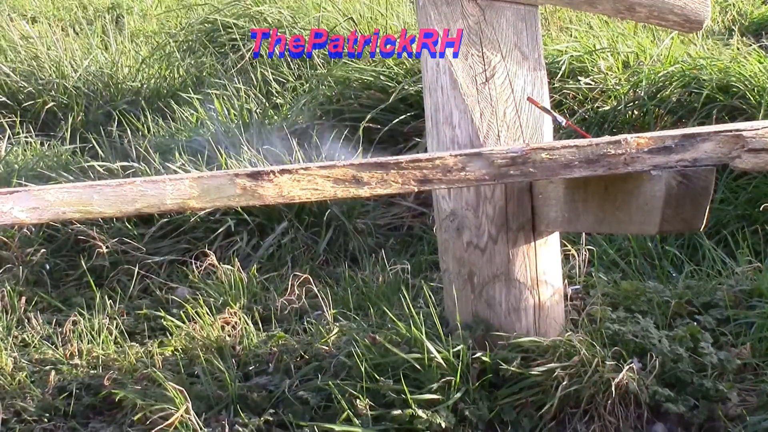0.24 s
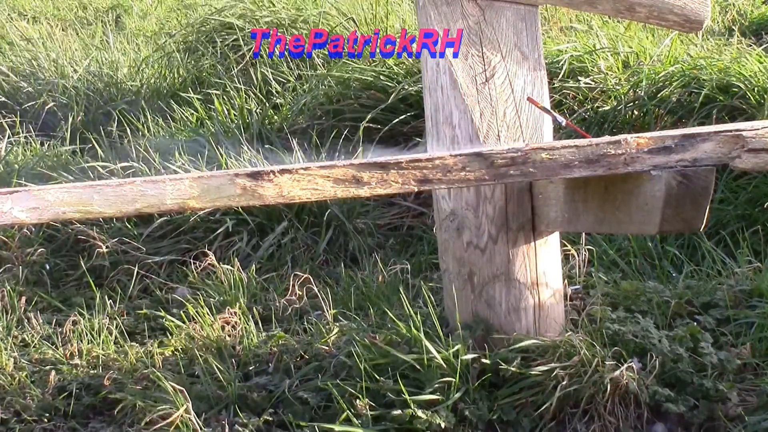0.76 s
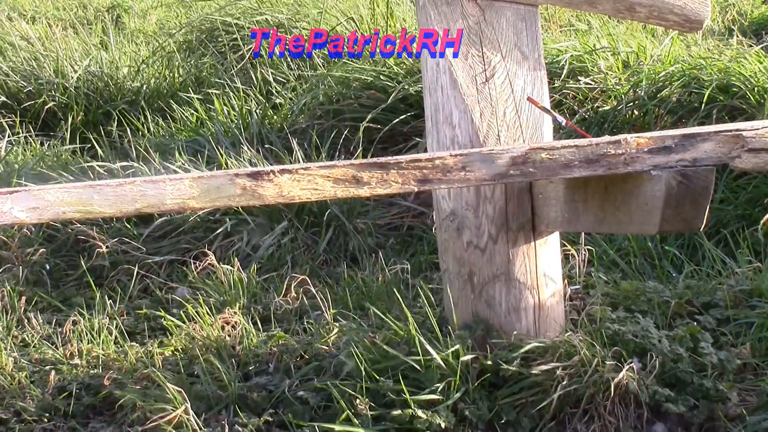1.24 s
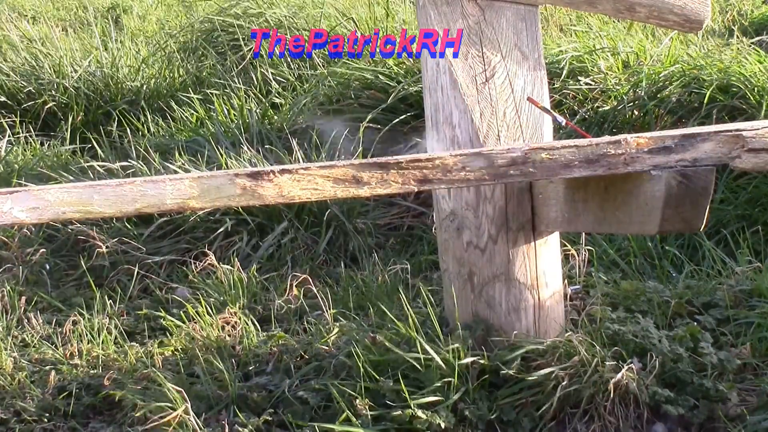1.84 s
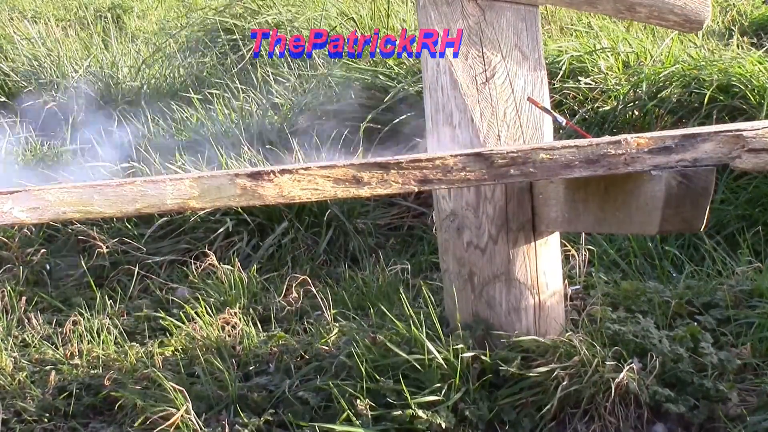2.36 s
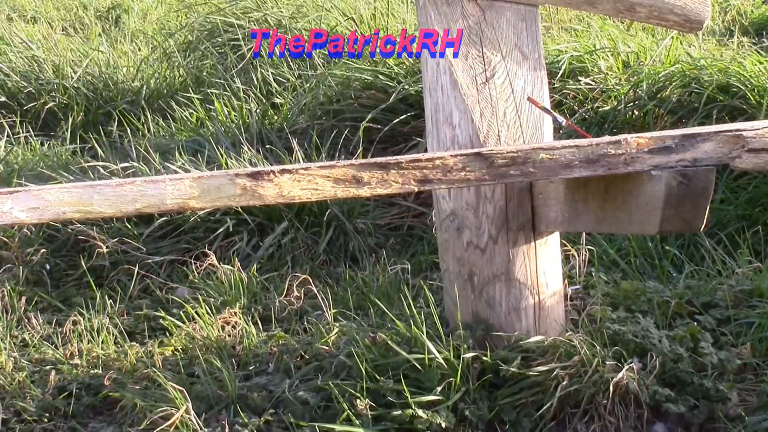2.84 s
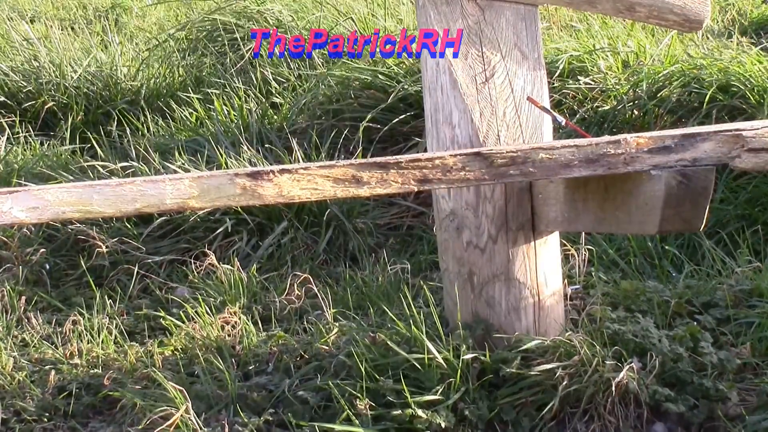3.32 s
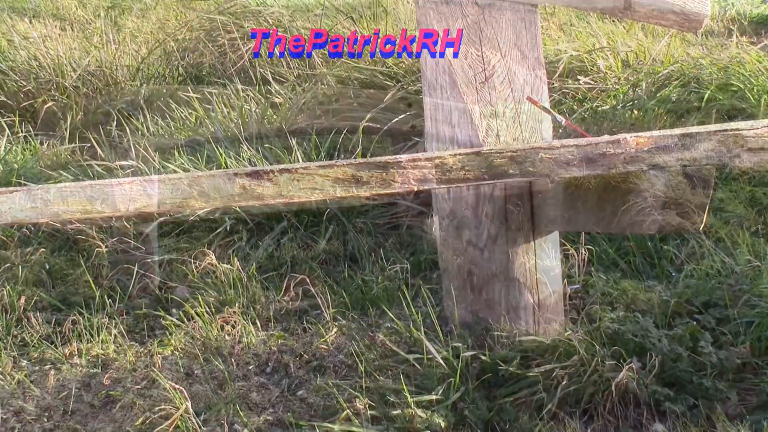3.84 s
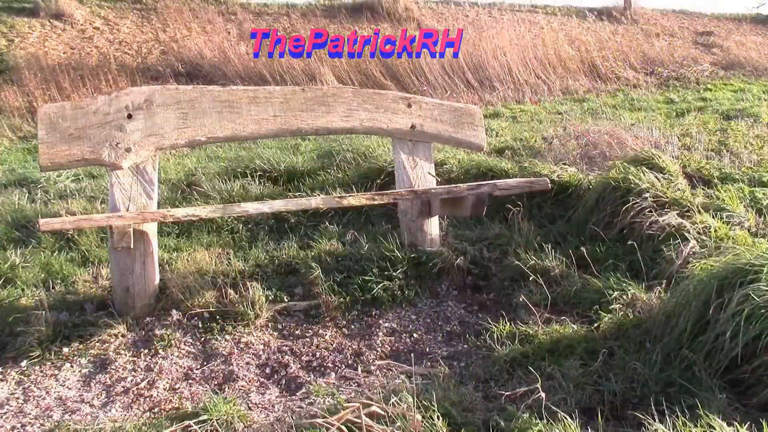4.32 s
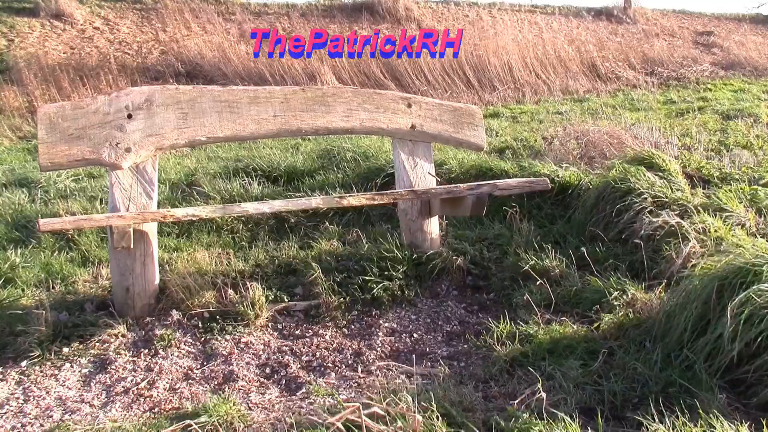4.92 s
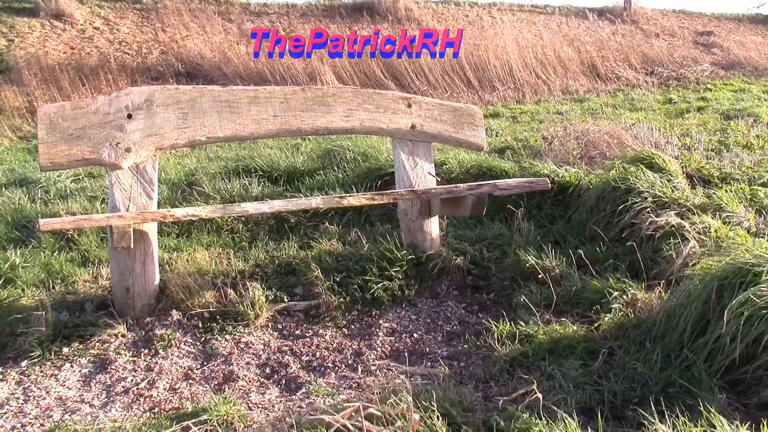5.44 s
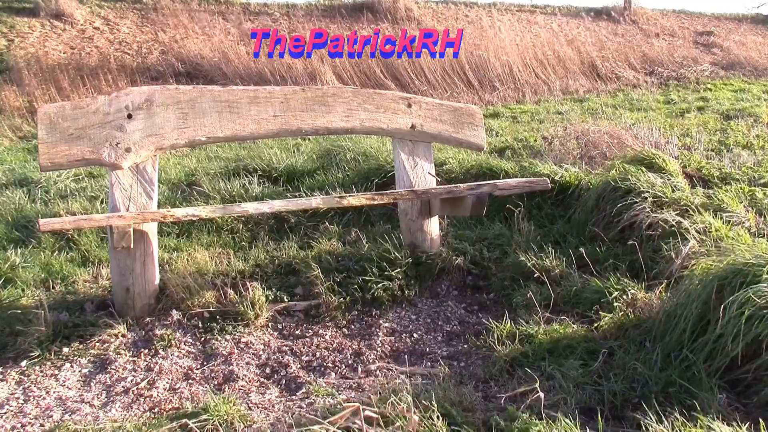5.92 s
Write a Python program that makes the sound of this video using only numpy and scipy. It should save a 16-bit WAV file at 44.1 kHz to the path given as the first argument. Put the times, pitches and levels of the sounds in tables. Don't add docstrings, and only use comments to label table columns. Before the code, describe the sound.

A burning fuse fizzes in uneven jets by a wooden bench while strong wind rumbles directly on the stereo microphone. Fine ticks and a louder crack precede a single dry, distorted firecracker bang. Faint echoes return from distant banks; everything else is briefly quieter, then buffeting gusts recover, with thin grass rustle and no further explosions.

```python
import sys
import numpy as np
from scipy import signal
from scipy.fft import rfft, irfft
from scipy.io import wavfile
from scipy.ndimage import uniform_filter1d, minimum_filter1d

SR = 44100
rng = np.random.default_rng(int(sys.argv[2]) if len(sys.argv) > 2 else 0)


def linear_from_db(decibels):
    return 10 ** (np.asarray(decibels, float) / 20)


def to_wav(s):
    ch = np.atleast_2d(s).T
    pcm = np.round(np.clip(ch, -1, 1) * 32767)
    wavfile.write(sys.argv[1], SR, pcm.astype(np.int16))


N = 272538
BANG_S = 2.4138

# start in seconds, peak in dB, flash of brightness in dB.
SLAPS = [(0.023, -13.5, 13), (0.042, 3.5, 1), (0.082, -4, 9.5), (0.198, -5, 4.5), (0.429, -5, 0.5),
         (0.614, -2, 3), (0.997, -6.5, 5), (1.024, 0, 1.5), (1.393, -3.5, 4), (1.434, 3, -0.5),
         (1.454, -4.5, 6.5), (1.542, -3.5, -0.5), (1.813, -19, 2), (2.109, -1.5, 5), (2.257, -8.5, 11.5),
         (2.369, -10.5, 5.5), (2.781, -20, 13), (2.876, -19.5, 8.5), (3.012, -23, 17.5), (3.33, -21.5, 8),
         (3.656, -19, 8), (4.678, -5, 6.5), (4.797, -6, 3), (4.866, -7, 7.5), (4.884, -5.5, 3),
         (5.376, -4, 2.5), (5.556, -8, 13.5), (5.601, -12, 1), (5.753, -8.5, 0), (5.991, -10.5, 3.5)]
# start in seconds, length in seconds, speed gain in dB.
PUFFS = [(0.081, 0.068, 9.5), (0.174, 0.017, 4.5), (0.321, 0.02, 6), (0.645, 0.15, 1.5),
         (1.101, 0.061, 4.5), (1.256, 0.028, 3.5), (1.364, 0.12, 2.5), (1.478, 0.016, 3),
         (1.801, 0.013, 12), (2.111, 0.01, 7.3), (2.161, 0.062, 6), (2.858, 0.0086, 5),
         (2.871, 0.089, 11.5), (3.221, 0.023, 6), (3.316, 0.012, 1.5), (3.378, 0.011, 3.5),
         (3.487, 0.025, 3), (3.574, 0.042, 5), (3.801, 0.014, 6), (3.87, 0.017, 9.5), (3.923, 0.049, 6.5),
         (4.005, 0.04, 2.5), (4.51, 0.015, 3), (4.666, 0.018, 0), (4.831, 0.045, 2.5), (5.252, 0.043, 1),
         (5.552, 0.013, 6.5), (5.63, 0.039, 3.0), (5.988, 0.0079, 8.5)]
PUFF_ATTACK_S, PUFF_RELEASE_S = 0.0027, 0.0099
# lower edge in Hz, upper edge in Hz.
GUST_HZ = [(40, 130), (150, 600), (800, 1600), (2000, 3500)]


def curve(rows):
    s, *columns = np.transpose(rows)
    return [np.interp(np.arange(N) / SR, s, c) for c in columns]


def unit(x):
    return x / np.sqrt(np.mean(x ** 2))


def colour(x, shape):
    hz, db = np.transpose(shape)
    grid = np.maximum(np.arange(2049) * SR / 4096, 1)
    ceps = irfft(np.log(linear_from_db(np.interp(np.log(grid), np.log(hz), db))))
    ceps[1:2048] *= 2
    ceps[2049:] = 0
    kernel = irfft(np.exp(rfft(ceps)))
    if x.ndim == 2:
        kernel = kernel[None]
    return signal.fftconvolve(x, kernel)[..., :x.shape[-1]]


def band(x, lo_hz, hi_hz, order=2):
    edges = [lo_hz, min(hi_hz, .45 * SR)]
    return signal.sosfilt(signal.butter(order, edges, "band", fs=SR, output="sos"), x)


def walk(rate):
    k = int(SR / rate)
    held = np.repeat(rng.standard_normal(N // k + 1), k)
    return unit(uniform_filter1d(held, k)[:N])


def clicks(rate, scatter_db):
    hit = rng.random(N) < rate / SR
    sign = np.sign(rng.standard_normal(N))
    return unit(hit * sign * linear_from_db(scatter_db * np.minimum(rng.exponential(size=N), 4)))


def burst(s, t60, length=.4):
    t = np.arange(N) / SR - s
    return (t >= 0) * (t < length) * linear_from_db(-60 * np.clip(t, 0, length) / t60)


def swell(s, length, attack, release):
    t = np.arange(N) / SR - s
    return np.clip(t / attack, 0, 1) * np.clip((length + release - t) / release, 0, 1)


def gain_db():
    duck_db, recover_db_per_s = 18, 4.5
    ahead_s, ramp_s = .036, .022
    since = np.arange(N) / SR - BANG_S
    drop = np.clip((since + ahead_s) / ramp_s, 0, 1)
    return drop * np.minimum(recover_db_per_s * since - duck_db, 0)


def air_speed():
    # time in seconds, air speed in dB over the usual, eddy size in dB.
    drift = [(0, -8.5, 5.5), (0.35, 5.5, -2.9), (0.56, 9, -3.5), (1.1, 2.5, 0), (1.62, -1.5, 0.5),
             (1.7, -29, 3.5), (2.0, -10, 1.2), (2.4, -36, 19), (2.45, -10, -1.5), (2.86, -12, -1.5),
             (3.1, 1.05, 1.94), (3.85, 0, -5.1), (4.25, 8, -6), (4.35, 0, 4.5), (4.9, 3, 2.5),
             (5.33, -5.5, 8.5), (6.03, -14, 6), (6.18, -28.5, -5.5)]
    # start in seconds, length in seconds, speed loss in dB.
    lulls = [(0.0, 0.018, 10), (0.052, 0.02, 7.0), (0.35, 0.21, 12.5), (0.4, 0.014, 25), (0.58, 0.032, 6.3),
             (0.77, 0.079, 3.5), (1.21, 0.15, 5.5), (1.61, 0.016, 7.5), (1.74, 0.015, 14),
             (1.88, 0.044, 6.7), (1.92, 0.07, 22.5), (2.23, 0.02, 18), (2.47, 0.042, 19), (2.67, 0.1, 7.5),
             (2.82, 0.028, 6.5), (3.02, 0.13, 4.5), (3.06, 0.056, 12.5), (3.26, 0.048, 5), (3.41, 0.059, 7),
             (3.54, 0.015, 5.4), (3.69, 0.041, 4), (4.55, 0.033, 4.5), (4.6, 0.067, 8.5),
             (4.74, 0.062, 8.5), (4.93, 0.042, 5.5), (5.34, 0.02, 21.5), (5.4, 0.037, 8.5),
             (5.48, 0.079, 14), (5.72, 0.019, 13.5), (6.09, 0.02, 15)]
    lull_sag_s = .012
    rounding = .25
    hush_s, hush_db = 0.012, 6.5
    speed_db, size_db = curve(drift)
    for rows, sign, attack in ((PUFFS, 1, PUFF_ATTACK_S), (lulls, -1, lull_sag_s)):
        for s, length, db in rows:
            soft = rounding * length
            speed_db += sign * db * swell(s - soft / 2, length, attack + soft, PUFF_RELEASE_S + soft)
    for s, *_ in SLAPS:
        speed_db -= hush_db * swell(s - hush_s - .001, hush_s, hush_s, .001)
    return speed_db, size_db


def tilt(eddies, hz, tip):
    knots = np.log2([np.sqrt(lo * hi) for lo, hi in GUST_HZ] + [6000])
    air = np.zeros(N)
    for centre in np.arange(4, 13.1, .5):
        share = np.cos(np.pi * np.clip(hz - centre, -.5, .5)) ** 2
        place = np.interp(centre, knots, np.arange(len(knots)))
        k = min(int(place), len(knots) - 2)
        level_db = tip[k] + (place - k) * (tip[k + 1] - tip[k])
        air += irfft(eddies * share, N) * linear_from_db(level_db)
    return air


def two_ports(air):
    # time in seconds, microseconds the left port hears the air late.
    port_lag = [(0, 31), (2.4, 23), (2.9, 22), (4.3, 27), (6.18, 27)]
    slope = band(np.gradient(air), 650, 9000, order=1)
    slope = band(slope[::-1], 650, 9000, order=1)[::-1]
    lag = curve(port_lag)[0] * SR / 1200000.0 * slope
    apart = band(air, 900, 5000) * linear_from_db(-35) * walk(330)
    return air + np.array([[-1], [1]]) * (lag + apart)


def wind():
    # frequency in Hz, level in dB per Hz.
    wind_colour = [(12, -57), (20, -35.5), (117, -5), (191, -0.5), (327, -2.5), (439, -3.5), (734, -10),
                   (961, -15), (1730, -29), (4610, -65), (7000, -80), (9100, -88.5), (15400, -120)]
    # Boom, rumble, flutter and rasp at the usual speed, in dB.
    usual_db = [-25, -11.5, -28, -44]
    # dB gained per dB of speed, so fast air is bright.
    speed_slope = [.3, .6, 1.01, 1.35]
    boom_wander_db, boom_size = 2, .6
    puff_flash = 0.41
    speed_db, size_db = air_speed()
    levels = [db + slope * speed_db for db, slope in zip(usual_db, speed_slope)]
    boom_db, rumble_db, flutter_db, rasp_db = levels
    boom_db = boom_db - rumble_db + boom_wander_db * walk(8.4) - (1 - boom_size) * size_db
    flutter_db = flutter_db - rumble_db
    rasp_db = rasp_db - rumble_db
    rumble_db += size_db + gain_db()

    push = clicks(900, scatter_db=2.0) + .5 * rng.standard_normal(N)
    flash = np.zeros(N)
    for s, length, db in PUFFS:
        flash += puff_flash * db * swell(s, length, PUFF_ATTACK_S, PUFF_RELEASE_S)
    for s, db, flash_db in SLAPS:
        i = int((s - .001) * SR)
        flash[i:i + 2000] += flash_db * np.exp(-np.arange(2000) / SR / 0.018)
        hit = int(s * SR)
        push[hit] -= linear_from_db(db - rumble_db[hit] + 12.5)

    eddies = rfft(colour(push, wind_colour) * signal.windows.tukey(N, .002))
    hz = np.log2(np.maximum(np.arange(len(eddies)) * SR / N, 1))
    usual = []
    for lo, hi in GUST_HZ:
        inside = (hz > np.log2(lo)) & (hz < np.log2(hi))
        usual.append(10 * np.log10(np.sum(np.abs(eddies[inside]) ** 2)))
    puff = walk(30)
    flick = .55 * walk(60) + walk(240)
    boom_tip = boom_db - usual[0] + usual[1]
    rumble_tip = 1.2 * puff
    flutter_tip = np.minimum(flutter_db, -7.5) - usual[2] + usual[1]
    flutter_tip = flutter_tip + 0.27 * puff + 1.7 * flick + 0.49 * flash - .9
    rasp_tip = np.minimum(rasp_db, -19) - usual[3] + usual[1]
    rasp_tip = rasp_tip + 1.4 * puff + 3.1 * flick + flash - 1.4
    top_tip = rasp_tip + 0.2 * (rasp_tip - flutter_tip)
    air = tilt(eddies, hz, [boom_tip, rumble_tip, flutter_tip, rasp_tip, top_tip])
    air *= linear_from_db(rumble_db - usual[1]) * N / np.sqrt(2)
    lean = np.minimum(.9 / (np.abs(air) + 1e-9), 1)
    air *= uniform_filter1d(minimum_filter1d(lean, 400), 400)
    return two_ports(air)


def fuse():
    # frequency in Hz, level in dB per Hz.
    fuse_colour = [(1500, -7), (3500, -4), (4800, -5), (5700, -2), (7500, 0), (8600, -4), (10500, -3),
                   (13800, -10), (16000, -18)]
    # start in seconds, length in seconds, dB over the simmer.
    spurts = [(-.05, .19, 21.5), (0.143, .13, 12.5), (0.362, .17, 12), (.84, .1, 7.5), (0.932, .22, 12),
              (1.339, .17, 10), (1.55, .2, 7.5), (1.868, 0.024, 8.5), (1.932, 0.031, 4.5), (2.026, .05, 6),
              (2.173, 0.057, 11.5), (2.27, .09, 3.5)]
    # start in seconds, peak in dB, centre in Hz, left
    # minus right in dB.
    spits = [(0.7452, -32.5, 3960, -3.5), (0.8036, -45, 4010, -18), (1.6684, -38, 5300, -14),
             (1.7095, -34.5, 4050, -8), (1.7374, -28.5, 4150, -8), (1.7434, -33, 6160, -2),
             (1.748, -42, 10300, -3), (1.7624, -43, 4125, -8), (1.8243, -45, 7090, -12.5),
             (1.8791, -36, 4210, -4.5), (1.8961, -27.5, 8190, -9), (1.9114, -46, 8800, -7.5),
             (1.956, -40.5, 5700, -14), (1.9744, -37, 5070, -3), (2.0193, -44.5, 4280, -6.5),
             (2.0634, -38, 4580, -4.5), (2.0894, -40.5, 6660, -4.0), (2.3161, -41, 4980, 8.5),
             (2.956, -58.5, 5000, -1), (3.0235, -47.5, 5980, -1), (3.202, -61.5, 9000, 0.5),
             (3.439, -65, 10000, -3.5), (3.8322, -56, 4000, -17.5),
             (1.7382, -21.5, 1850, -4.5),
        (1.9744, -34.5, 2306, 1),
        (2.018, -35.5, 1800, -6),
        (5.0428, -39.5, 4560, -4.5),
        (1.968, -37.5, 1500, 2.5),
        (3.013, -44.5, 2200, 0),
    ]
    simmer_db, swell_db_per_s = -63.5, 23
    attack_s, release_s = 0.063, 0.05
    t = np.arange(N) / SR
    rises = []
    for s, length, db in spurts:
        build_db = swell_db_per_s * np.clip(t - s - length, -length, 0)
        rises.append((db + build_db) * swell(s, length, attack_s, release_s))
    hiss_db = simmer_db + np.max(rises, axis=0) + gain_db()
    shared = rng.standard_normal(N) + .45 * clicks(400, scatter_db=5.0)
    body = 0.61 * band(shared, 600, 5500, order=4)
    spray = band(.05 * shared + rng.standard_normal((2, N)), 5500, 19000, order=4)
    jet = unit(colour(body + spray, fuse_colour))
    out = jet * linear_from_db(hiss_db + 5.0 + np.array([[-1.2], [1.2]])) * (t < BANG_S)

    t = np.arange(300) / SR
    for s, db, hz, pan_db in spits:
        grit = rng.standard_normal((2, len(t)))
        tick = band((grit[0] + .5 * grit) * linear_from_db(-60 * t / .006), .4 * hz, 1.9 * hz)
        i = int(s * SR)
        level_db = db + 1.0 + np.array([[pan_db], [-pan_db]]) / 2
        out[:, i:i + len(t)] += tick / np.abs(tick).max() * linear_from_db(level_db)
    mid = out.mean(axis=0)
    return mid + band(out - mid, 5200, 19000, order=4)


def bang():
    # delay in seconds, level in dB, 60 dB decay in seconds, centre in Hz.
    echoes = [
        (.0011, -2, 0.014, 4440),
        (.004, -15, 0.047, 2406),
        (.006, -30, 0.051, 7980),
        (0.011, -40, .45, 2300),
        (0.019, -52.5, 0.34, 6480),
        (.185, -54.5, .25, 2500),
        (.25, -57.5, 0.13, 2085),
        (.327, -55.5, 0.064, 2100),
    ]
    patchy_db = 2.2
    shock_s = .00052
    t = np.arange(N) / SR - BANG_S
    shock = np.where((t >= 0) & (t < shock_s), 6 * (2 * t / shock_s - 1), 0)
    late = np.clip(t - shock_s, 0, 1)
    ball = -3.0 * np.sin(np.pi * (late / .0007) ** .52) * np.exp(-late / .0027)
    out = np.tile(shock + ball, (2, 1))
    for delay, db, t60, hz in echoes:
        scatter = rng.standard_normal(N) + 1.5 * band(rng.standard_normal((2, N)), 6000, 18000)
        scatter = unit(band(scatter, .4 * hz, 1.9 * hz))
        lumps = linear_from_db(db + patchy_db * min(delay / .01, 1) * walk(160))
        out += scatter * lumps * uniform_filter1d(burst(BANG_S + delay, t60), 1 + int(0.13 * delay * SR))
    tear = linear_from_db(-16) * np.exp(np.clip(t, -1, 0) / .001) * (t < 0)
    return out + tear * unit(band(rng.standard_normal(N), 1000, 11000))


def grass():
    # frequency in Hz, level in dB per Hz.
    grass_colour = [(3000, -3), (6000, 5), (10000, 3), (12000, 0), (14000, 0.5), (16000, -9.5)]
    # start in seconds, length in seconds, rise in dB.
    rustles = [
        (3.106, .04, 4.5),
        (3.571, .07, 12),
        (4.82, .06, 6.5),
        (5.5, .04, 4.5),
    ]
    db = -71.5 + gain_db()
    for s, length, rise_db in rustles:
        db += rise_db * swell(s, length, 0.027, 0.043)
    rustle = rng.standard_normal((2, N)) + 0.14 * clicks(270, scatter_db=1.5)
    rustle = unit(colour(rustle, grass_colour))
    return rustle * linear_from_db(db + 7 + .8 * walk(14)) * (np.arange(N) > BANG_S * SR)


def scene():
    return wind() + fuse() + bang() + grass()


def roll_off(x):
    return signal.sosfilt(signal.butter(12, 15920, fs=SR, output="sos"), x)


def record(dry):
    flat = np.clip(dry, -.97, .97)
    return roll_off(flat)


dry = scene()
out = record(dry)
to_wav(out)
```